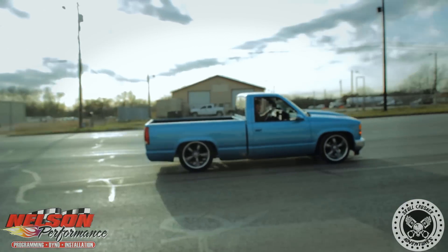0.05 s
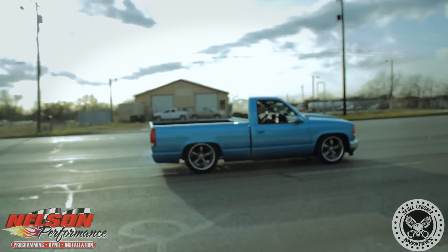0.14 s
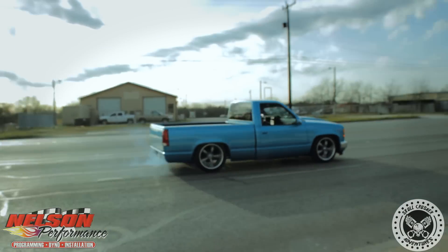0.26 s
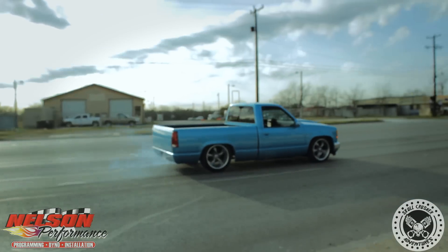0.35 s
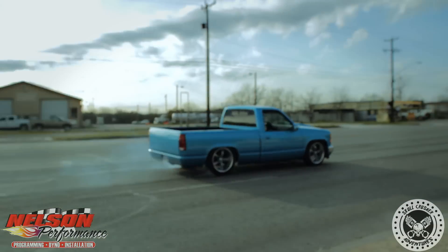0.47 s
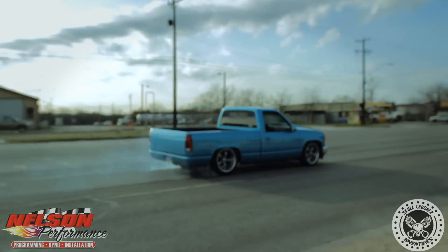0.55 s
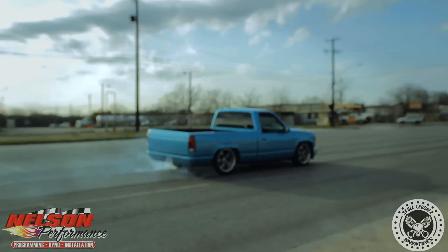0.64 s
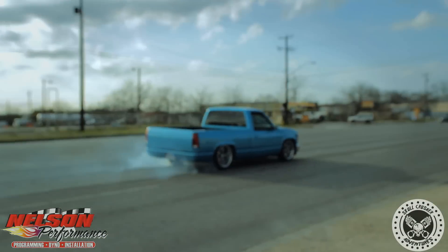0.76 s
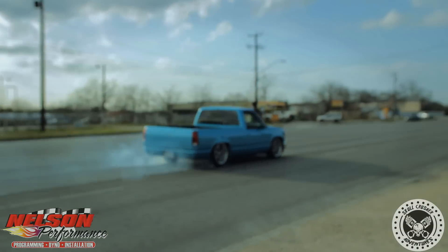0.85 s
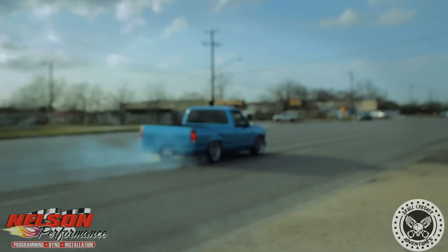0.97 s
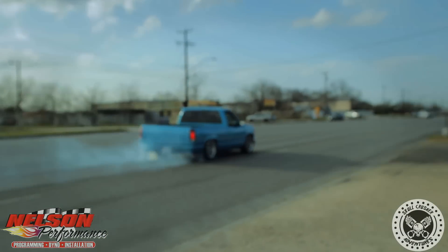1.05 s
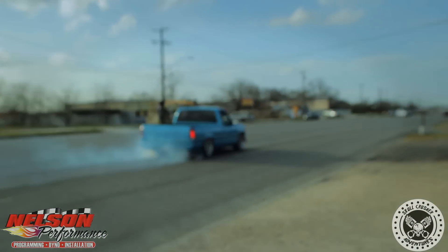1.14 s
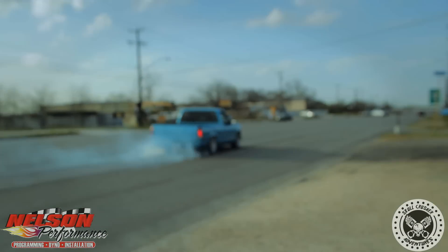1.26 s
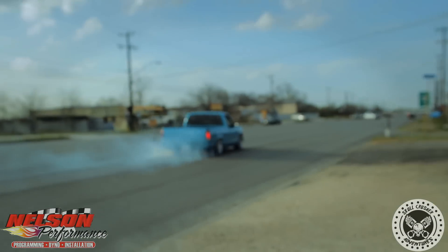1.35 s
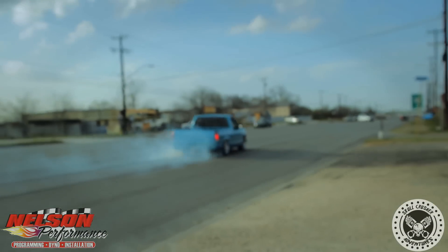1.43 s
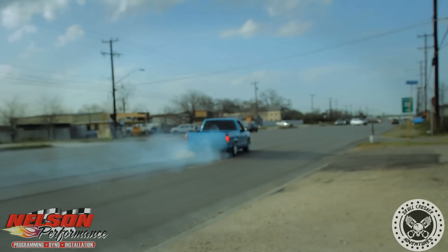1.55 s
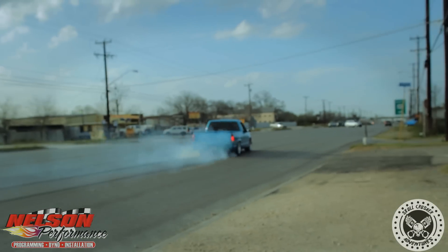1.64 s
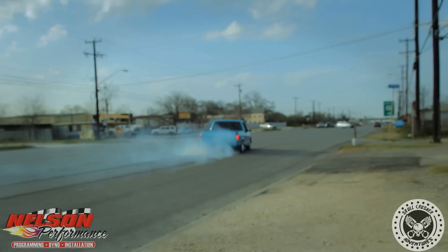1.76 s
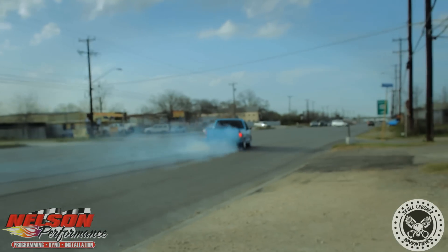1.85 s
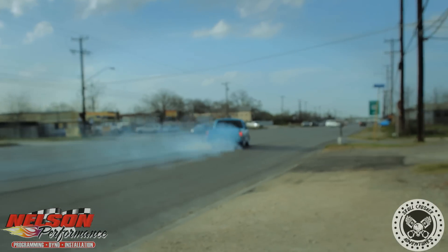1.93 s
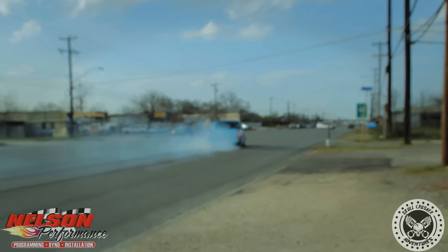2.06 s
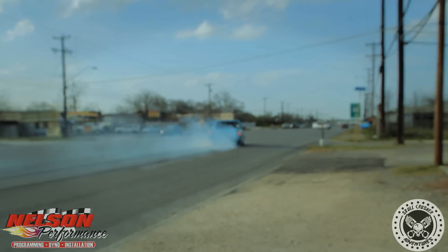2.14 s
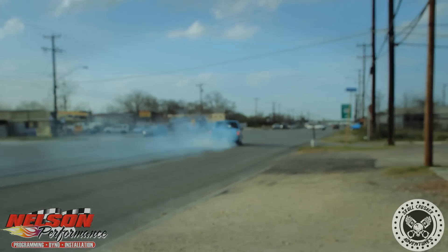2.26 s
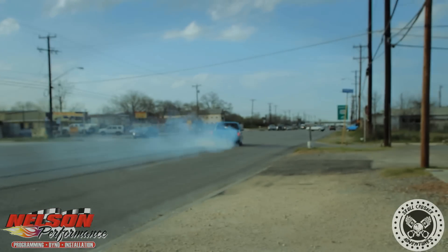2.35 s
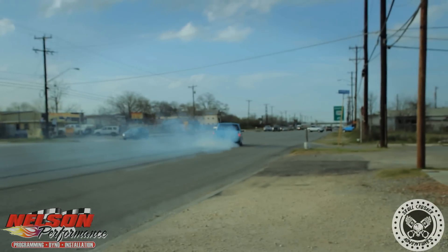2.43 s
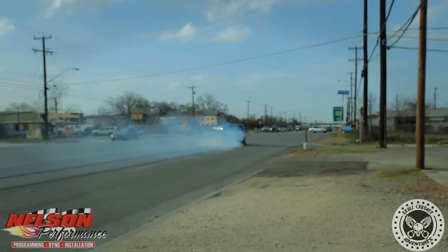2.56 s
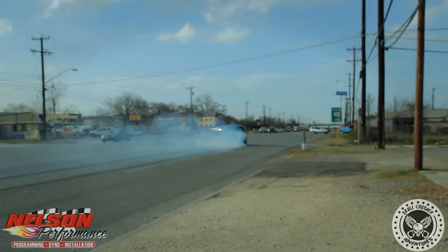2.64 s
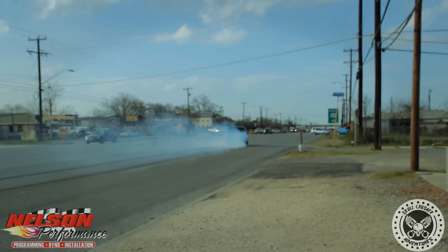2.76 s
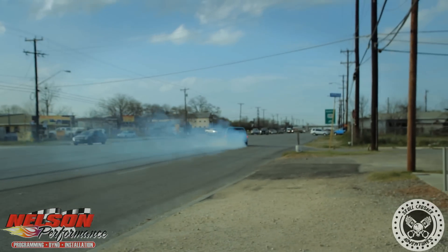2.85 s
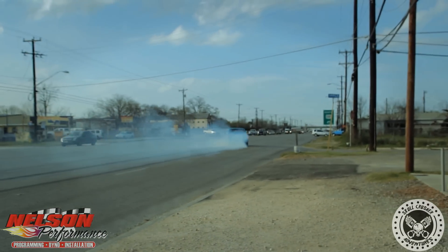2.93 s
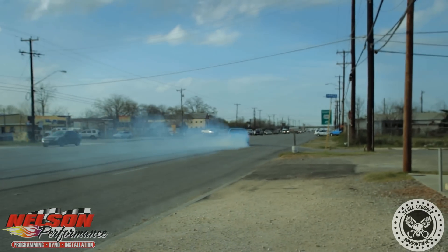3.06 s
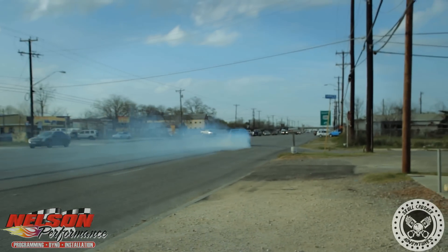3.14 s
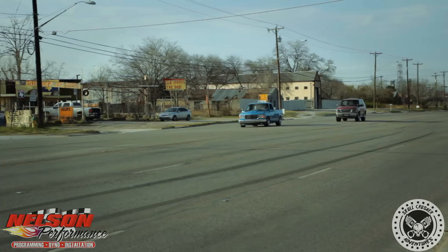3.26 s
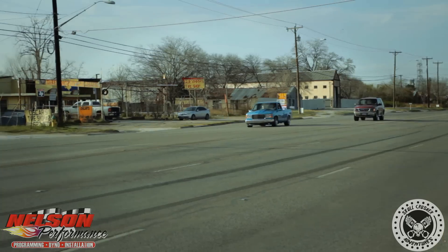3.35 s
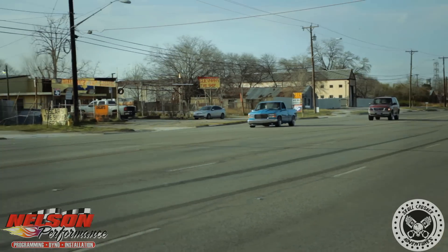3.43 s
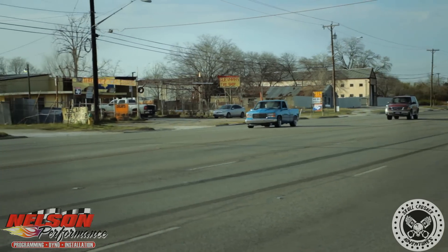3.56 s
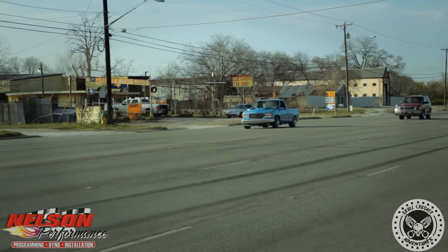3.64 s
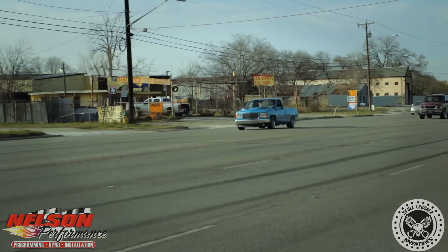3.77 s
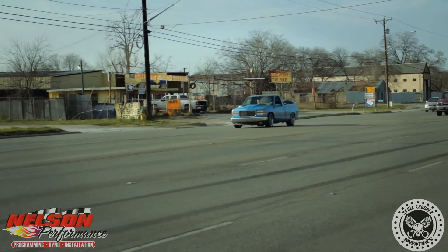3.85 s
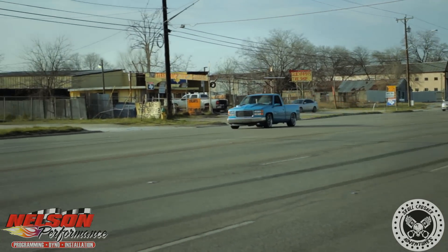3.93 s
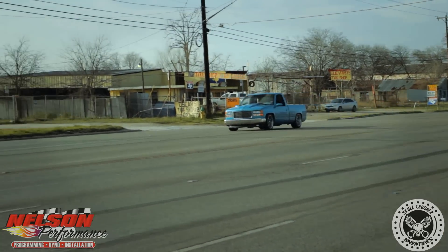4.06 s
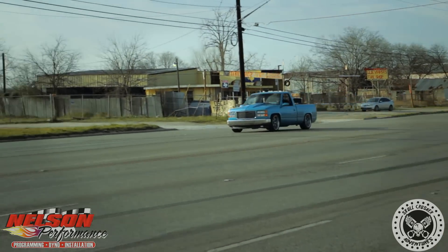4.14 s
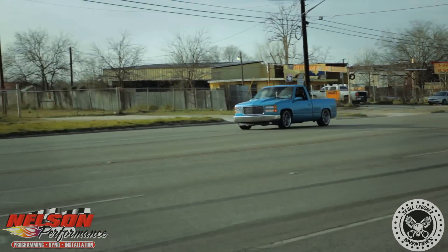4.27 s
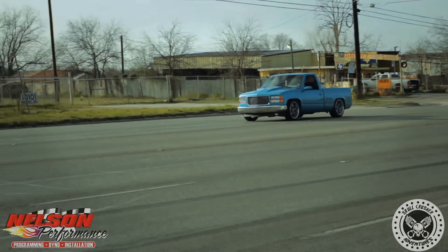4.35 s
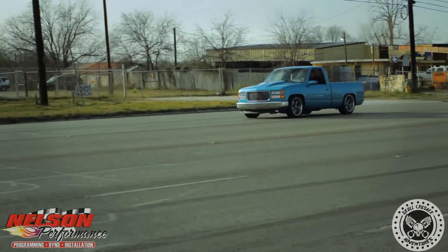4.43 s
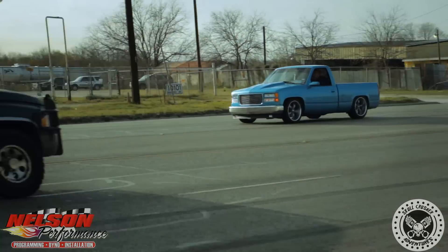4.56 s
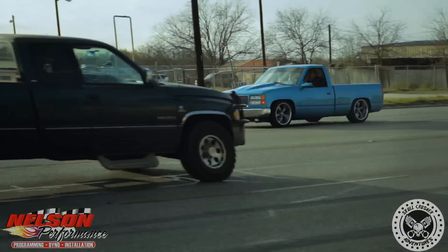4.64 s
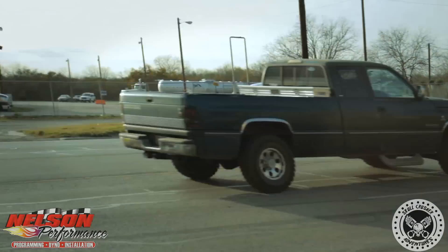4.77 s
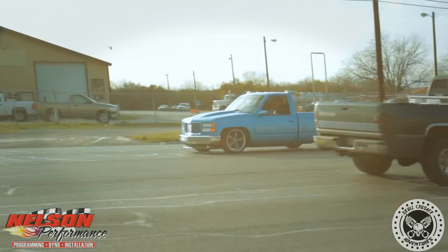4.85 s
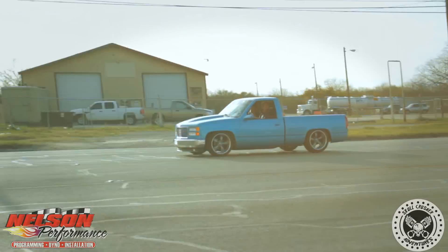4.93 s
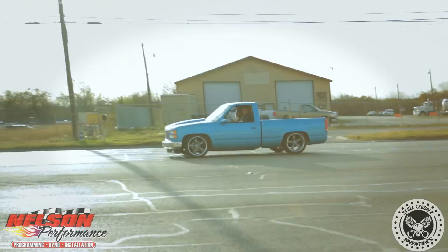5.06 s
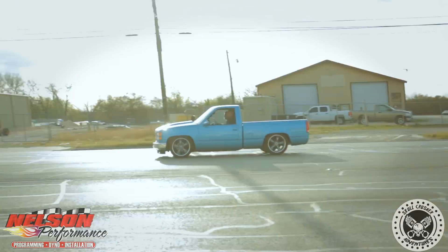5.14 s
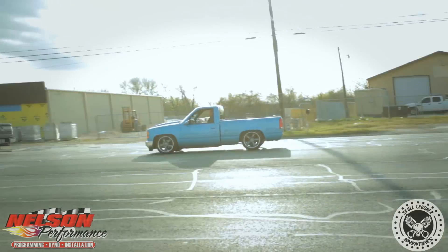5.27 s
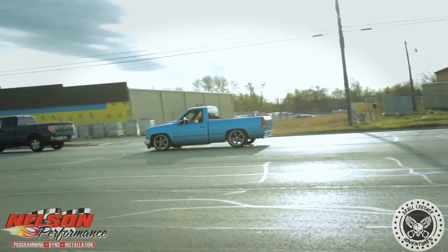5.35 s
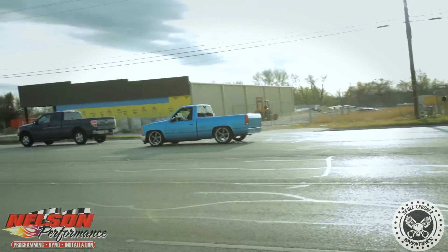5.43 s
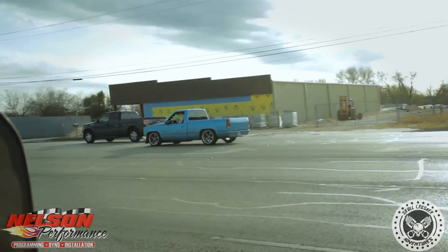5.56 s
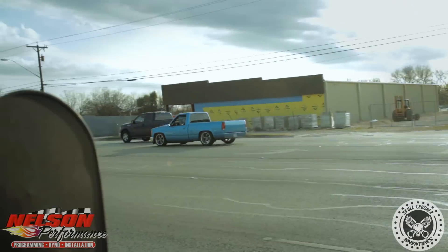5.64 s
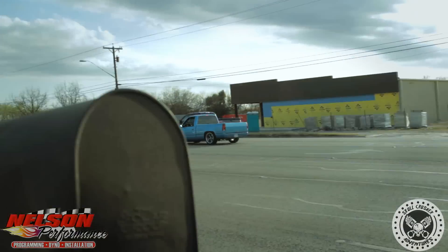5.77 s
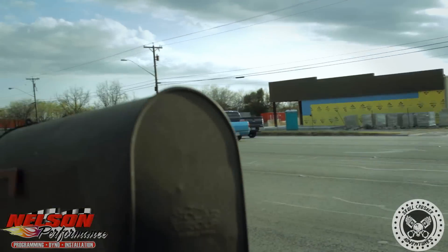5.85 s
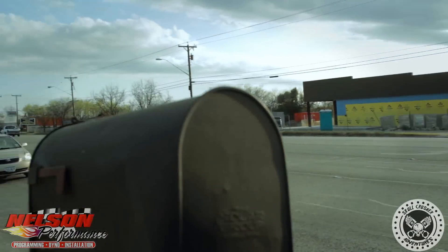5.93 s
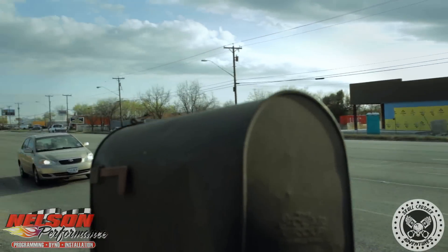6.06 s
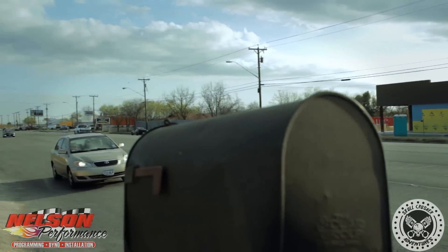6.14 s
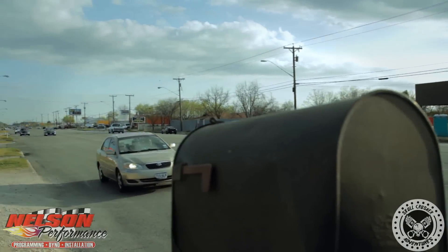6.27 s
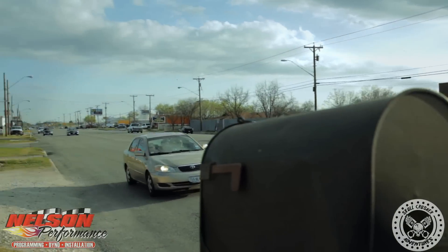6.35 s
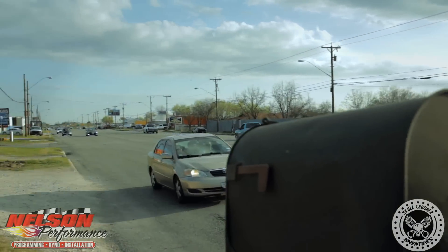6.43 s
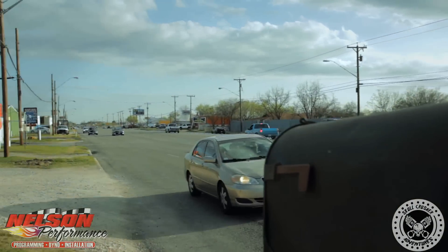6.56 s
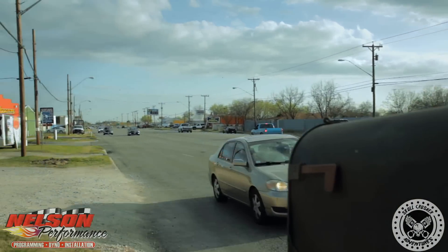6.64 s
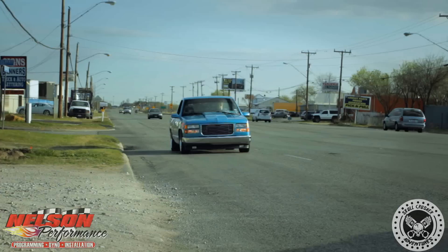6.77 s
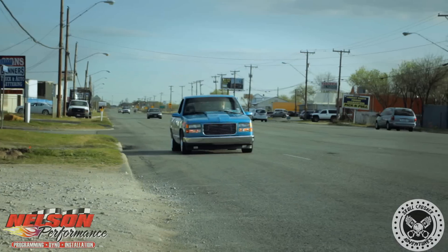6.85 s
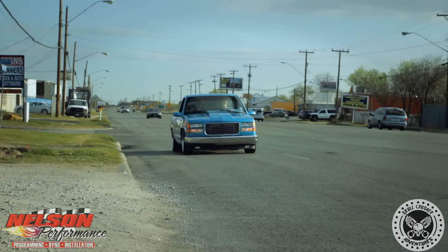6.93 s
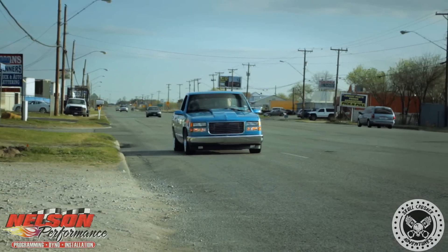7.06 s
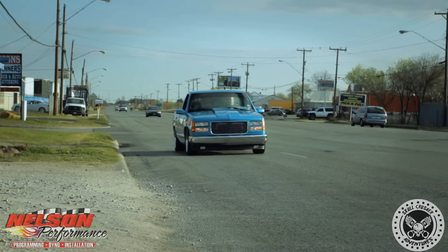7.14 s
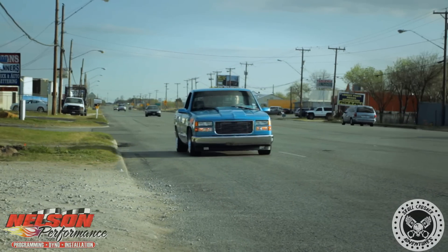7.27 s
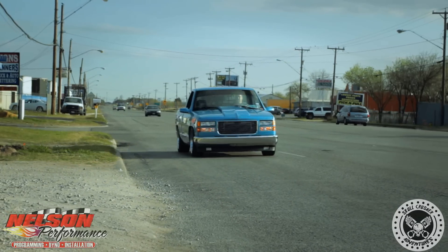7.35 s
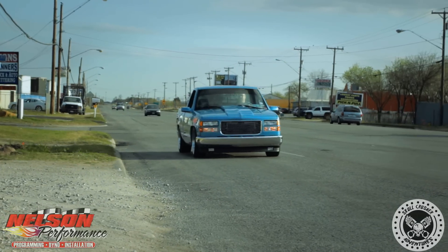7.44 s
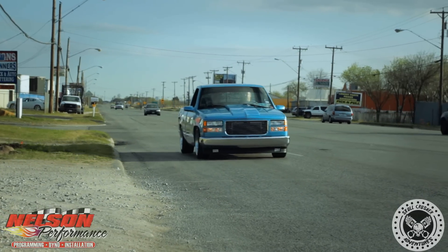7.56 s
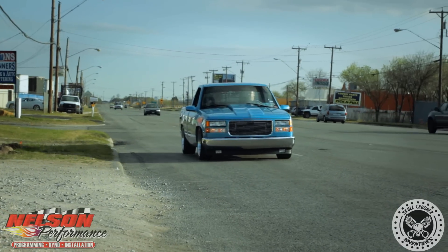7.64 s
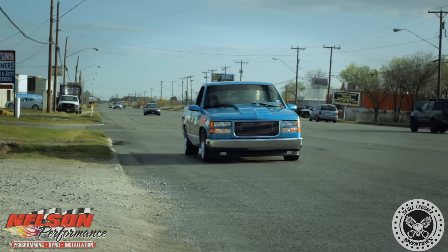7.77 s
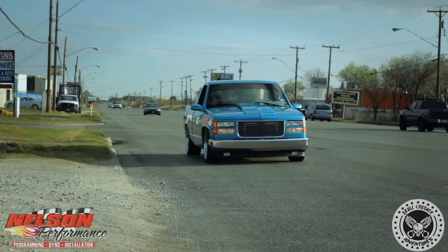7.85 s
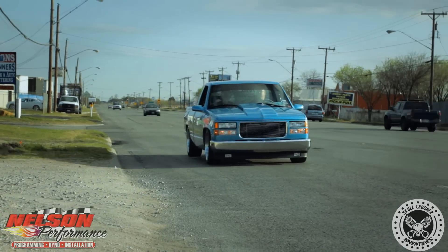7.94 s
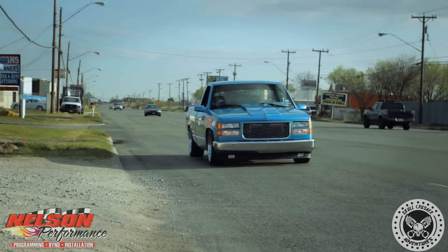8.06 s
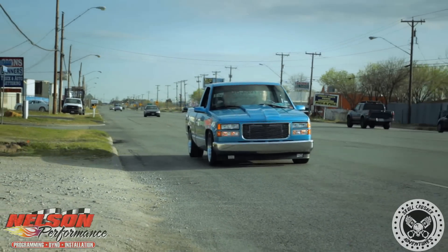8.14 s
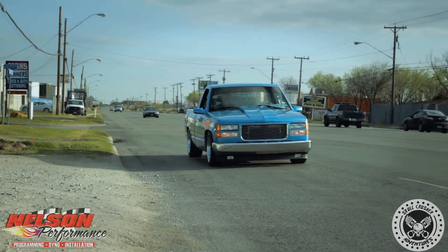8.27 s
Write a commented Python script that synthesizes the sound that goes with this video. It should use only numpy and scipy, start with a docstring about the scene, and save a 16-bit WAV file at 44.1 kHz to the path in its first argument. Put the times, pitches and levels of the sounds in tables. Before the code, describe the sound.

A loud, raspy V8 truck engine breaks for a gear change with sharp exhaust pops, then pulls away over scrubbing, screeching tyres. After receding it accelerates back toward the roadside listener, and the throttle shuts with a thin descending whistle. The engine note sinks as other cars wash by. After an abrupt change of position, the truck approaches at a crawl, burbling over outdoor traffic noise.

```python
"""A turbocharged V8 pickup shifts up with a bang, spins its tyres and drives off down an open street.
It returns under power, lifts off with a falling turbo whistle and burbles past among traffic.
At 6.9 s the listening position jumps and the truck rolls slowly closer. Its firings make the exhaust
note, thud through the tailpipe and pulse the rushing gas; unburnt fuel pops, slipping rubber screeches."""
import sys
import numpy as np
from scipy import signal
from scipy.fft import rfft, irfft, next_fast_len
from scipy.io import wavfile
from scipy.ndimage import map_coordinates

SR = 44100
rng = np.random.default_rng(int(sys.argv[2]) if len(sys.argv) > 2 else 0)


def store_wav(level_fs):
    """Save 16-bit WAV to argv[1]."""
    pcm = np.round(np.clip(np.atleast_2d(level_fs), -1, 1) * 32767)
    wavfile.write(sys.argv[1], SR, pcm.T.astype(np.int16))


N = 366030
TIME_S = np.arange(N) / SR


def amp(db):
    """Decibels to gain."""
    return 10 ** (np.asarray(db) / 20)


def unit_rms(x):
    """Scale to rms 1."""
    return x / np.sqrt(np.mean(x ** 2) + 1e-20)


def curves(rows):
    """One value per sample for each column after the time."""
    times_s, *columns = np.transpose(rows)
    return [np.interp(TIME_S, times_s, column) for column in columns]


def wobble(rate_hz):
    """Smooth random curve, rate_hz knots a second."""
    knots = rng.standard_normal(int(N * rate_hz / SR) + 4)
    coarse_s = TIME_S[::32]
    return np.interp(TIME_S, coarse_s, map_coordinates(knots, [coarse_s * rate_hz]))


def filtered(x, response):
    """Apply a complex frequency response."""
    size = next_fast_len(N + SR // 2)
    return irfft(rfft(x, size) * response(np.fft.rfftfreq(size, 1 / SR)), size)[:N]


def coloured(x, spectrum):
    """Shape x by (Hz, dB) points, at rms 1."""
    points_hz, db = np.transpose(spectrum)
    return unit_rms(filtered(x, lambda hz: amp(np.interp(np.log(hz + 1), np.log(points_hz), db))))


def noise():
    """White noise, rms 1."""
    return rng.standard_normal(N)


# Each row: press start, release start, press time and release time in seconds, depth 0-1.
PEDAL_PUSHES = [(-.1, 0.264, .05, 0.059, 0.99), (0.412, 3.015, 0.047, 0.3, 1),
                (3.54, 4.935, 0.11, 0.072, 0.97), (5.28, 6.86, 0.2, 0.033, 0.35),
                (7.8, 8.3, 0.42, .1, 0.38)]


def pedal():
    """Throttle 0-1: each push opens, holds and closes."""
    pushes = [depth * np.interp(TIME_S, [down, down + press, up, up + release], [0, 1, 1, 0])
              for down, up, press, release, depth in PEDAL_PUSHES]
    return np.clip(sum(pushes), 0, 1)


# Each row: muffler resonance in Hz, half width in Hz, boost in dB.
MUFFLER_MODES = [(70.7, 6, 1), (107, 7, 4.5), (131, 9, 0.5), (165.6, 20, 3.5), (232, 3, 1), (278, 5.3, 1),
                 (314, 5.4, 7), (374, 23, 1)]
# Each row: time in seconds, extra level in dB.
ORDER_5_DB = [(0, -21), (.16, 4.5), (.3, -0.5), (1.85, 1.5), (2.5, -3.5), (3.1, -0.5), (3.5, 0.5),
              (4.95, 0), (5.04, -21), (5.28, -13), (5.42, -1.5), (5.9, -1), (6.2, 5), (6.5, -6.5),
              (7.7, -6), (7.98, 4)]
ORDERS_8_9_DB = [(1.22, 0.5), (1.38, -13), (1.7, -5.5), (2.05, -4.5), (2.4, -3.5), (3.05, 2), (3.5, 2.5),
                 (5.7, -3), (6.15, -9), (6.68, 2), (6.9, -2)]


def order_boost_db(order, cycle_hz):
    """An order swells as it sweeps through a muffler resonance; three also wax and wane on their own."""
    muffler_db = sum(db / (1 + ((order * cycle_hz - hz) / width) ** 2) for hz, width, db in MUFFLER_MODES)
    own = {5: ORDER_5_DB, 8: ORDERS_8_9_DB, 9: ORDERS_8_9_DB}
    return muffler_db + (curves(own[order])[0] if order in own else 0)


# Each row: order, then relative level in dB alongside, leaving, returning, at light load.
LOW_ORDERS_DB = [(2, -22, -20, -16.5, -29), (3, -12, -4.5, -9, -13), (4, -13, -19.5, -11.5, -13),
                 (5, -7, -3, 2.5, -2), (6, -9.5, -15.5, -10, -18), (7, -31, -27, -24, -21),
                 (8, -4, -6.5, -6.5, -1.5), (9, -13.5, -6.5, -8.5, -13.5), (10, -35, -21, -22, -13.5),
                 (11, -18.5, -19, -19, -15), (12, -16, -14.5, -20, -10)]
# Each row: order, then level against the roar in dB near, far, returning.
HIGH_ORDERS_DB = [(13, -21.5, -25, -18), (14, -13, -16, -18.5), (15, -23, -22, -13), (16, -23, -25, -39),
                  (17, -18.5, -22.5, -48), (18, -21.5, -14.5, -14), (19, -11, -13, -19.5),
                  (20, -18, -20, -17), (21, -19, -46, -11), (22, -13.5, -8, -12), (23, -17, -14, -21),
                  (24, -14, -42, -31), (25, -33, -20.5, -14), (26, -13, -15, -28), (27, -20.5, -14, -16.5)]


def exhaust_note(cycles, cycle_hz, throttle, level_db, roar_db):
    """Harmonics of the engine cycle: steady under load, weak and ragged with the throttle shut."""
    shut = (1 - throttle) ** 2
    rough_db = 0.9 + 3.5 * shut
    note_db = level_db - 13 * shut

    def partial(order, db, flutter_db, drift_rad):
        phase = 2 * np.pi * (order * cycles + rng.random()) + drift_rad * wobble(14)
        return np.sqrt(2) * amp(db + flutter_db * wobble(18)) * np.sin(phase)

    note, blare = np.zeros((2, N))
    for order, *stage_db in LOW_ORDERS_DB:
        db = np.interp(TIME_S, [0, .3, .42, 3.2, 3.5, 4.96, 5, TIME_S[-1]], np.repeat(stage_db, 2))
        db += note_db + order_boost_db(order, cycle_hz)
        note += partial(order, db, flutter_db=rough_db, drift_rad=.041 * rough_db)
    for order, near, far, back in HIGH_ORDERS_DB:
        pipe_aim_db = np.interp(TIME_S, [1.3, 1.9, 3.2, 3.5], [near, far, far, back])
        blare += partial(order, roar_db + pipe_aim_db, flutter_db=2.2, drift_rad=.27)
    return note + throttle ** 2 * blare


# Each row: resonance in Hz, width in Hz, gain in dB.
PIPE_MODES = [(77.5, 73, -3), (159, 72, 2.5), (232.5, 52, 0), (343, 140, -7), (520, 130, -18)]


def tailpipe(x):
    """The pipe rings at its resonances; its small mouth radiates no deep bass."""
    def response(hz):
        return sum((-1) ** k * amp(db) * 1j * hz * width / (mode_hz ** 2 - hz ** 2 + 1j * hz * width)
                   for k, (mode_hz, width, db) in enumerate(PIPE_MODES))

    mouth = signal.butter(4, [50, 800], "bandpass", fs=SR, output="sos")
    return signal.sosfilt(mouth, filtered(x, response))


def burble(cycles, throttle, level_db):
    """Firings of random strength thud through the tailpipe, most of all off the throttle."""
    firings = np.flatnonzero(np.diff(np.floor(cycles * len(CYLINDER_GAINS))))
    spacing = np.gradient(firings.astype(float))
    puffs = np.zeros(N)
    puffs[firings] = rng.uniform(-1.26, 1, len(firings)) * np.sqrt(spacing)
    gas = unit_rms(puffs) + .5 * noise()
    return amp(level_db - 6.5 - 12.5 * throttle ** 2) * unit_rms(tailpipe(gas))


# Each law: base in dB, dB per dB of truck level, dB with throttle shut, dB per octave, dB fully dulled.
ROAR_LAW_DB = (-21, 1, -3.5, 6, 0)
RASP_LAW_DB = (-21.5, 1.0268, -12, 5.5, -5.5)
HISS_LAW_DB = (-33.5, 1.28, -11.5, 6, -10.5)
# Each row: time in seconds, share 0-1 by which the exhaust's rasp and hiss are muted.
TREBLE_DULLING = [(3.3, 0.2), (3.45, 1), (4, 0.64), (4.7, 0.08), (5.6, 0.33), (6.2, 0.8), (7, 0.9)]
REFERENCE_HZ, REFERENCE_DB = 45, -20


def rush_level_db(law, level_db, cycle_hz, throttle):
    """A band of the rush grows with nearness, throttle and engine speed; the treble dulls at times."""
    base_db, growth, shut_db, octave_db, dulled_db = law
    effort_db = shut_db * (1 - throttle) + octave_db * np.log2(cycle_hz / REFERENCE_HZ)
    dulling_db = dulled_db * curves(TREBLE_DULLING)[0]
    return base_db + growth * (level_db - REFERENCE_DB) + effort_db + dulling_db


def air_dulled(x):
    """Air absorbs the top of a distant hiss; result at rms 1."""
    return unit_rms(filtered(x, lambda hz: 1 / (1 + (hz / 7800) ** 3)))


# Pulse strengths in firing order; the banks take unequal turns.
CYLINDER_GAINS = [0.37, 0.63, 0.46, 0.88, 1, 0.79, 0.71, 0.39]
# Each row: frequency in Hz, relative density in dB.
ROAR_SPECTRUM = [(120, -64), (250, -5.5), (430, -3.5), (520, -8), (630, -11), (740, -2.5), (900, -1),
                 (1080, -2), (1350, -1), (1900, -5), (2400, -8.5), (3500, -50), (6000, -120)]
ROAD_SPECTRUM = [(120, -62), (350, -11), (520, -3), (750, 0), (1000, -0.5), (1400, -3), (1900, -8),
                 (2400, -13), (3500, -29.5), (6000, -120)]
RASP_SPECTRUM = [(800, -99), (1400, -57), (2000, -6), (2600, 1.5), (3300, 1.5), (3700, -2.5), (4200, -9),
                 (5200, -16.5), (6500, -41), (12000, -100)]
HISS_SPECTRUM = [(2000, -91.5), (3500, -5.5), (5200, 0), (6200, -2), (7200, -4), (8500, -5), (10500, -8.5),
                 (12500, -10), (15500, -20), (17000, -94.5)]


def rush(cycles, throttle, roar_db, rasp_db, hiss_db):
    """Gas leaves in one turbulent jet per firing; off the throttle smooth road noise takes over."""
    firings = cycles * len(CYLINDER_GAINS)
    index = firings.astype(int)
    scatter_db = 1.66 * rng.standard_normal(SR // 10)[index]
    strength = np.take(CYLINDER_GAINS, index, mode="wrap") * amp(scatter_db)
    jets = unit_rms(strength * np.exp(-1.3 * (firings % 1)))

    def jet_noise(depth):
        return noise() * np.sqrt(1 + depth * throttle * (jets ** 2 - 1))

    pipes = amp(-1.5) * throttle * coloured(jet_noise(depth=.65), ROAR_SPECTRUM)
    road = amp(-2) * np.sqrt(1 - throttle ** 2) * coloured(noise(), ROAD_SPECTRUM)
    roar = amp(roar_db + .39 * wobble(23)) * (pipes + road)
    air = wobble(13) + wobble(45)  # moving air flutters the treble
    rasp = amp(rasp_db + .5 + .3 * air) * coloured(jet_noise(depth=.29), RASP_SPECTRUM)
    grit = amp(1.6 * wobble(400))
    bright = coloured(jet_noise(depth=.18) * grit, HISS_SPECTRUM)
    far = np.clip((-25 - hiss_db) / 15, 0, 1)  # fainter counts as farther
    hiss = amp(hiss_db + 2.23 + .97 * air) * ((1 - far) * bright + far * air_dulled(bright))
    return roar + rasp + hiss


# Each row: frequency in Hz, relative density in dB.
STREET_SPECTRUM = [(25, 10.5), (60, 1), (200, 6), (1000, -7), (2500, -26), (5000, -26.5), (9000, -29.5),
                   (15500, -29)]
POSITION_JUMP_S = 6.895


def street():
    """Distant traffic and faint steady hiss, louder at the second position."""
    return amp(np.where(TIME_S < POSITION_JUMP_S, -49, -42.5)) * coloured(noise(), STREET_SPECTRUM)


# Each row: start and length in seconds, start and end pitch in Hz, level in dB.
TURBO_WHISTLES = [(0.289, 0.1, 6430, 5550, -33), (0.39, 0.077, 6140, 5980, -33),
                  (3.28, .11, 5400, 5000, -73), (3.7, 1.3, 6600, 7350, -62), (4.97, .28, 7200, 5170, -48),
                  (5.218, 0.31, 5460, 5250, -55)]


def turbo():
    """Compressor blades whistle with a faint octave, gliding with shaft speed."""
    out = np.zeros(N)
    breath = 1 + .02 * wobble(600)
    for start_s, length_s, start_hz, end_hz, db in TURBO_WHISTLES:
        progress = np.clip((TIME_S - start_s) / length_s, 0, 1)
        pitch_hz = (start_hz + (end_hz - start_hz) * progress) * breath
        phase = 2 * np.pi * np.cumsum(pitch_hz) / SR
        arch = 2 * np.sqrt(progress * (1 - progress))
        out += amp(db) * arch * (np.sin(phase) + .13 * np.sin(2 * phase))
    return amp(2.8 * wobble(60)) * out


# Each row: start in seconds, thump peak in dB, crack against thump in dB, thump cutoff in Hz.
EXHAUST_POPS = [(.303, -2.5, -8, 700), (.362, -11, -24, 400), (.396, -8, -6, 700), (8.037, -22, -35, 170),
                (8.097, -21, -35, 130), (8.218, -20, -35, 130), (8.26, -21, -35, 170)]


def pops():
    """Unburnt fuel goes off in the pipe: a thump with a short crack, duller at low speed."""
    t = np.arange(SR // 8) / SR
    ring = tailpipe(signal.unit_impulse(N))[:len(t)]
    out = np.zeros(N + SR)
    for start_s, db, crack_db, cutoff_hz in EXHAUST_POPS:
        thump = signal.sosfilt(signal.butter(2, cutoff_hz, fs=SR, output="sos"), ring)
        thump /= np.abs(thump).max()
        crack = signal.lfilter([.3], [1, -.85], rng.standard_normal(len(t))) * amp(-60 * t / .05)
        out[round(start_s * SR):][:len(t)] += amp(db) * (thump + amp(crack_db) * crack)
    return out[:N]


# Each row: time in seconds, level in dB.
TYRE_SCRUB_DB = [(.4, -42), (.8, -22), (1.3, -24), (1.6, -21), (2, -28.5), (2.6, -31), (3.1, -37),
                 (3.4, -44), (3.6, -97)]


def tyres():
    """Spinning rubber scrubs in a hoarse band and screeches as it sticks and slips."""
    spectrum = [(500, -100), (1000, -36.5), (1400, -1), (1650, 1.5), (1900, -1),
                (2500, -24.5), (5000, -120)]
    pitch_hz = 1690 * (1 + .035 * wobble(15) + .06 * wobble(350))
    screech = .55 * amp(3 * wobble(14)) * np.sin(2 * np.pi * np.cumsum(pitch_hz) / SR)
    return amp(curves(TYRE_SCRUB_DB)[0] + 1.2 * wobble(22.12)) * (coloured(noise(), spectrum) + screech)


# Each row: time in seconds, level in dB. At the second position a car has just passed.
TRAFFIC_DB = [(3.4, -40), (5.8, -34.5), (6.89, -39), (6.9, -28), (7.14, -29), (7.42, -32.5), (8.3, -34)]


def traffic():
    """Tyres of other cars wash along the road, brighter when near."""
    db = curves(TRAFFIC_DB)[0]
    bright_db = 1.3 * (db + 30) + 1.5
    hiss = air_dulled(coloured(noise(), HISS_SPECTRUM))
    treble = amp(-15.5) * coloured(noise(), RASP_SPECTRUM) + amp(-29) * hiss
    return amp(db - 3 + .45 * wobble(12)) * (coloured(noise(), ROAD_SPECTRUM) + amp(bright_db) * treble)


def passing_engine(pass_s=4.85, half_length_s=.21, pitch_hz=73.6, fall_hz_per_s=7.9, level_db=-31):
    """Another engine's wavering drone swells, sinks by Doppler shift and fades."""
    since_s = TIME_S - pass_s
    phase = 2 * np.pi * np.cumsum(pitch_hz - fall_hz_per_s * since_s) / SR + .5 * wobble(12)
    overtones = .5 * np.sin(2 * phase + wobble(14)) + .5 * np.sin(3 * phase + 2 * wobble(20))
    swell = amp(level_db + 4 * wobble(8.7)) / (1 + (since_s / half_length_s) ** 2)
    return swell * (np.sin(phase) + overtones)


# Each row: time in seconds, four-stroke cycle rate in Hz.
CYCLE_AWAY_HZ = [(0, 48.3), (.27, 54.5), (.33, 48.3), (.41, 44.6), (.53, 44.3), (.63, 41.1), (1, 44.7),
                 (1.63, 49.1), (1.82, 43.6), (2, 40.9), (2.4, 39.7), (3.13, 38.6), (3.25, 32)]
CYCLE_BACK_HZ = [(3.5, 34.5), (3.75, 43.2), (4.03, 45.4), (4.75, 48.2), (4.96, 47), (5.14, 36),
                 (5.45, 32.7), (5.8, 31.5), (6.35, 24.4), (6.88, 19.8)]
CYCLE_CRAWL_HZ = [(6.9, 13.4), (7.6, 13.4), (7.95, 15), (8.17, 15), (8.3, 17.3)]
# Each row: time in seconds, truck level in dB as its distance changes.
AWAY_DB = [(0, -13.5), (.22, -11.5), (.5, -13.5), (1, -16.5), (1.42, -19), (2.1, -25), (2.7, -30),
           (3.4, -33.5)]
BACK_DB = [(3.6, -37), (4, -32), (4.45, -26), (4.8, -22), (4.94, -25.5), (5.06, -19.5), (5.55, -26),
           (6.2, -34.5), (6.88, -34)]
CRAWL_DB = [(6.9, -29), (7.75, -29.5), (8.3, -26)]
# Each row: centre and half length in seconds, then change of rasp, hiss and burble in dB.
EXHAUST_SWELLS = [(0.376, 0.026, -4, 1.5, 7.5), (0.848, 0.39, 1.5, 2, 1), (1.37, 0.079, 5, 3, 7),
                  (1.603, 0.3, -1, 0.5, 8.5), (3.295, 0.18, 5.5, 2, 4), (3.85, 0.29, 0, -1, 9),
                  (4.49, 0.14, 0.5, 2.5, 11), (4.955, .012, 6.5, 6, 0), (5.42, 0.069, -3, 0, -2.5),
                  (6.3, 0.37, -3, -5.5, 3), (8.12, .2, -5, -4, 0.5)]


def scene():
    """One crankshaft drives the note, the burble and the jets; throttle and distance set their levels."""
    cycle_hz = curves(CYCLE_AWAY_HZ + CYCLE_BACK_HZ + CYCLE_CRAWL_HZ)[0]
    level_db = curves(AWAY_DB + BACK_DB + CRAWL_DB)[0]
    throttle = pedal()
    cycles = np.cumsum(cycle_hz * (1 + .0015 * wobble(30))) / SR
    roar_db, rasp_db, hiss_db = [rush_level_db(law, level_db, cycle_hz, throttle)
                                 for law in (ROAR_LAW_DB, RASP_LAW_DB, HISS_LAW_DB)]
    rasp_swell_db, hiss_swell_db, burble_swell_db = sum(
        np.outer(dbs, np.exp(-((TIME_S - centre_s) / half_s) ** 2))
        for centre_s, half_s, *dbs in EXHAUST_SWELLS)
    truck = exhaust_note(cycles, cycle_hz, throttle, level_db, roar_db)
    truck += burble(cycles, throttle, level_db + burble_swell_db) + pops() + turbo()
    truck += rush(cycles, throttle, roar_db, rasp_db + rasp_swell_db, hiss_db + hiss_swell_db)
    return (truck + tyres() + traffic() + passing_engine() + street())[None]


def record(dry):
    """Bass cut at 36 Hz, soft clipping of the loudest peaks, band limit at 15.7 kHz."""
    sound = filtered(dry[0], lambda hz: hz ** 4 / (hz ** 4 + 36 ** 4))
    clipped = sound / (1 + np.abs(sound) ** 16) ** (1 / 16)
    return filtered(clipped, lambda hz: hz < 15700)[None]


dry = scene()
out = record(dry)
store_wav(out)
```